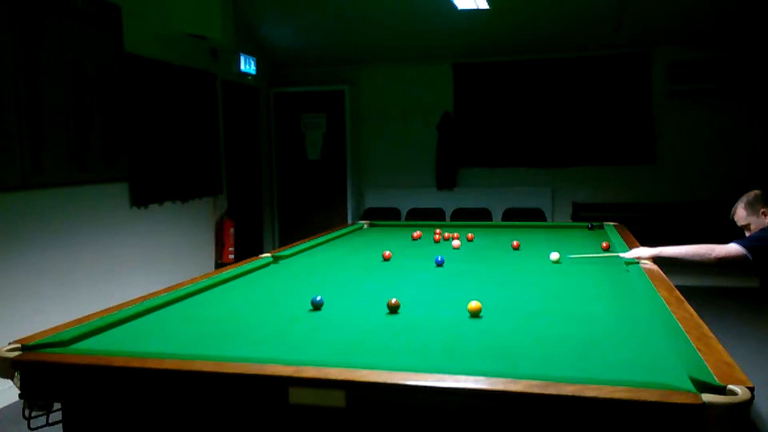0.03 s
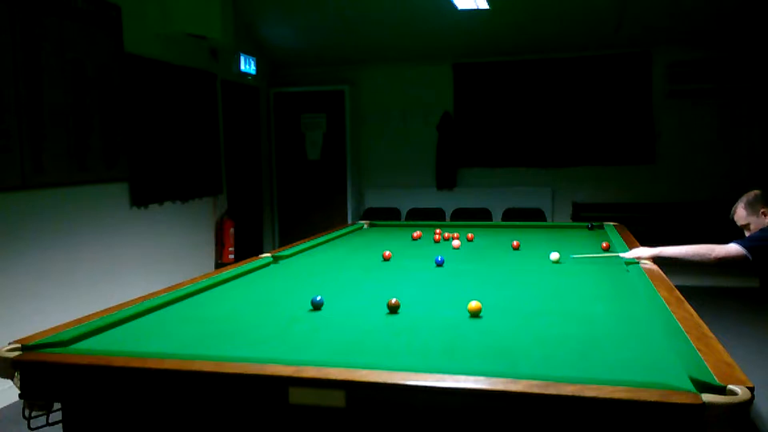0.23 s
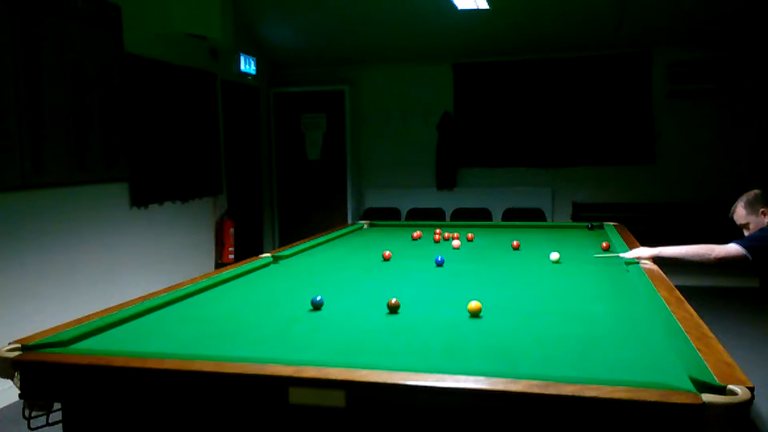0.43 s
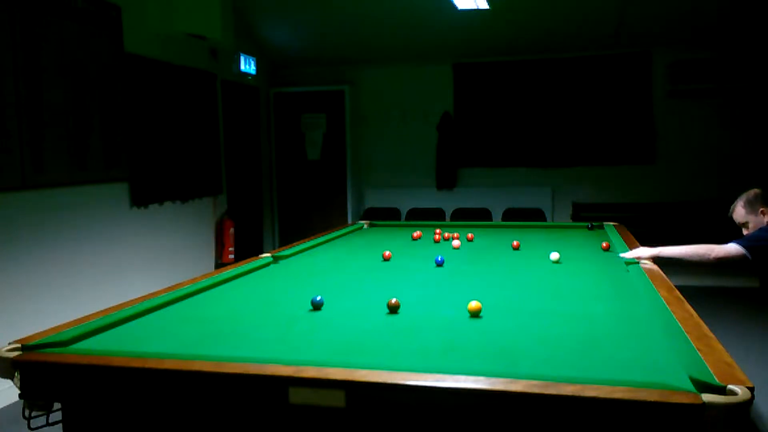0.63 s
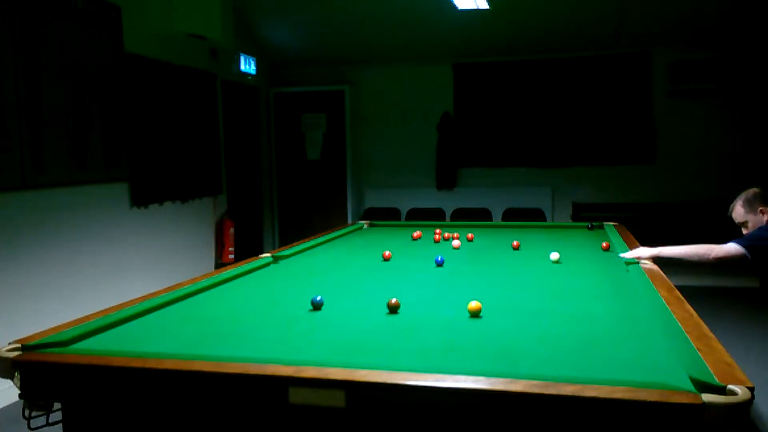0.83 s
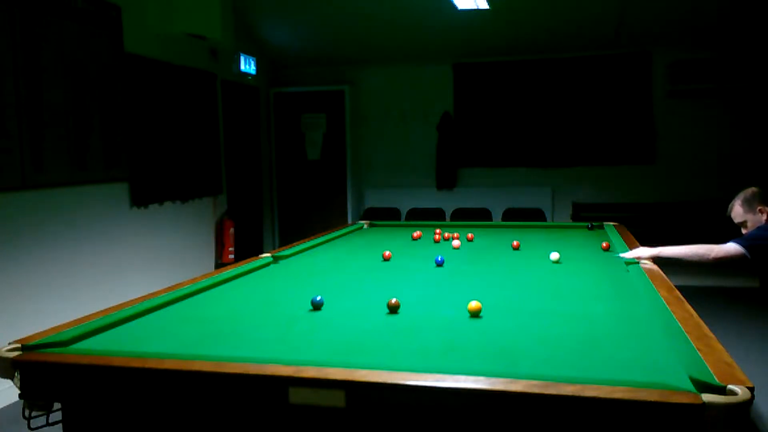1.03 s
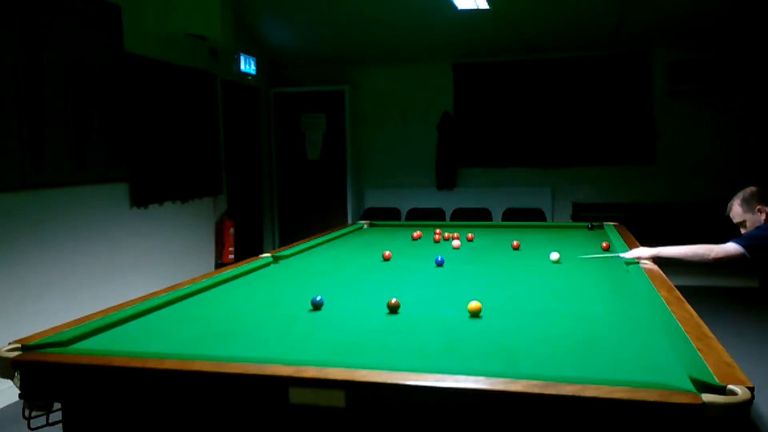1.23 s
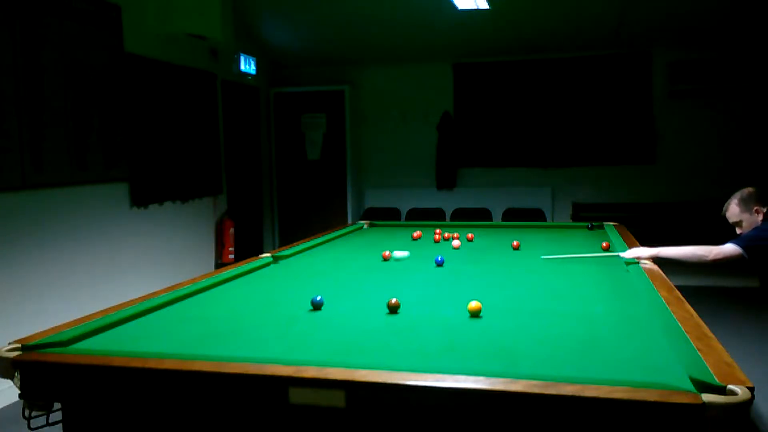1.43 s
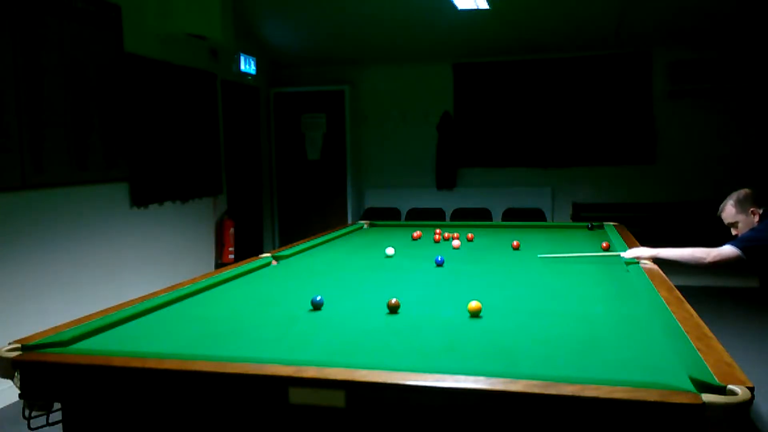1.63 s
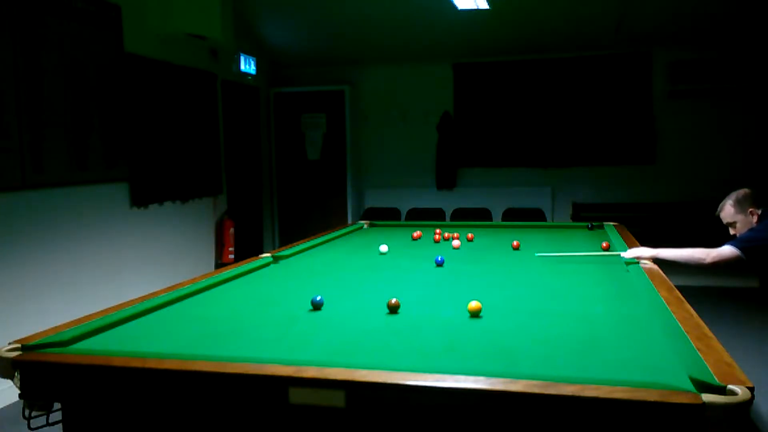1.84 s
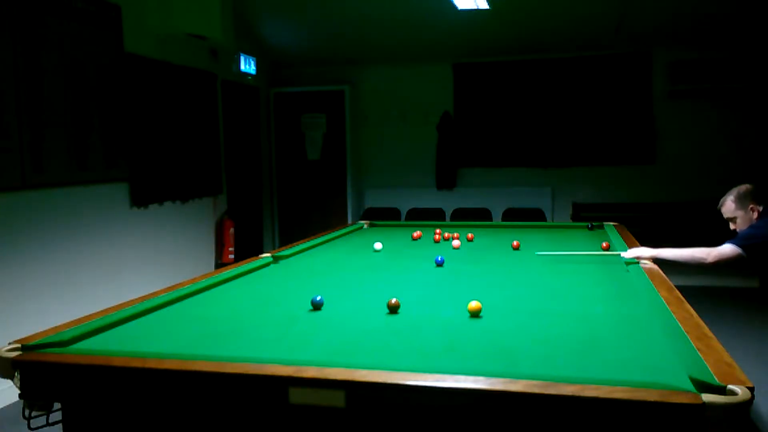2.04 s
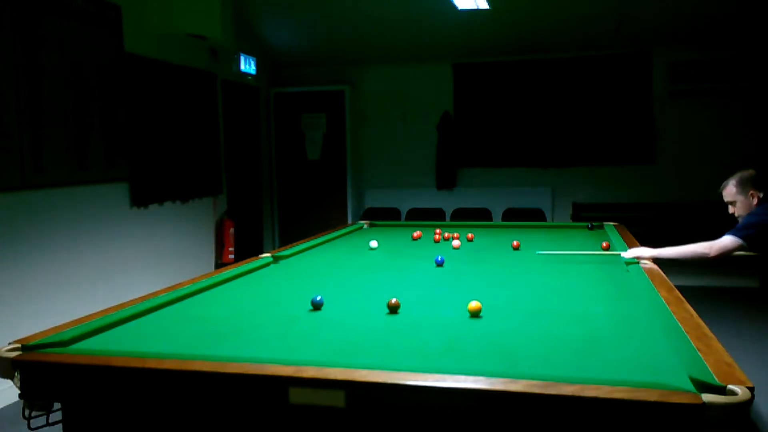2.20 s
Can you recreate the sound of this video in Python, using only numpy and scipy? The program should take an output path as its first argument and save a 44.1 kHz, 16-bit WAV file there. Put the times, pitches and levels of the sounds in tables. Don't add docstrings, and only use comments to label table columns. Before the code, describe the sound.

Billiard balls click hard just after a cue tip knocks the white; a ball then slaps into a leather pocket with a dull boom and rustles in the net, short room echo, hissy overloaded camera microphone.

```python
import sys
import numpy as np
from scipy import signal
from scipy.fft import rfft, irfft
from scipy.io import wavfile
from scipy.ndimage import uniform_filter1d

SR = 44100
rng = np.random.default_rng(int(sys.argv[2]) if len(sys.argv) > 2 else 0)


def attenuation_scalar(level_db):
    decades = np.asarray(level_db, float) / 20
    return 10 ** decades


def waveform_to_disk(signal):
    frames = np.transpose(np.atleast_2d(signal))
    scaled = np.clip(frames, -1, 1) * 32767
    samples = np.round(scaled).astype(np.int16)
    wavfile.write(sys.argv[1], SR, samples)


N = 99886


def evened(x):
    return x / np.sqrt(np.mean(x ** 2) + 1e-20)


def read(points, hz):
    f, value = np.transpose(points)
    return np.interp(np.log(hz + 1), np.log(f + 1), value)


def add(mix, s, sound):
    part = mix[round(s * SR):][:len(sound)]
    part += sound[:len(part)]


def noise(shape, size):
    hz = np.fft.rfftfreq(size, 1 / SR)
    spectrum = rfft(rng.standard_normal(size)) * attenuation_scalar(read(shape, hz))
    return evened(irfft(spectrum, size))


def ring(hz, db, t60, rise_s, size):
    t = np.arange(size) / SR
    return attenuation_scalar(db - 60 * t / t60) * np.sin(2 * np.pi * hz * t) * (1 - np.exp(-t / rise_s))


def low_pass(x, hz):
    taps = signal.firwin(255, hz, window=("kaiser", 8), fs=SR)
    return signal.oaconvolve(x, taps, "same")


def high_pass(x, hz):
    return signal.sosfilt(signal.butter(4, hz, "high", fs=SR, output="sos"), x)


def room(x, wet_db):
    # (f/Hz, t60/s)
    room_t60 = [(150, 0.32), (400, .58), (1040, 0.34), (2760, 0.33), (7280, 0.28), (15000, 0.34)]
    start_s, build_s = 0.012, 0.0034
    taps = np.zeros(SR)
    at = np.arange(0, SR - 16, 16)
    taps[at + rng.integers(0, 16, len(at))] = rng.choice([-1., 1.], len(at))
    hz, t, z = signal.stft(taps, SR, nperseg=256)
    dying = attenuation_scalar(-60 * t / read(room_t60, hz)[:, None])
    tail = signal.istft(z * dying, SR, nperseg=256)[1]
    tail = tail * np.clip((np.arange(len(tail)) / SR - start_s) / build_s, 0, 1)
    return attenuation_scalar(wet_db) * signal.fftconvolve(x, tail / np.linalg.norm(tail))[:N]


def hiss():
    # (f/Hz, level/dB)
    hiss_shape = [(24, -65), (40, -25), (457, -2), (557, -4), (1120, -2), (7390, -12), (9480, -13),
                  (15200, -16.5)]
    hump_hz, hump_width_hz, whine_hz = 9670, 500, 12010
    t = np.arange(N) / SR
    b, a = signal.iirpeak(hump_hz, hump_hz / hump_width_hz, SR)
    hump = evened(signal.lfilter(b, a, rng.standard_normal(N)))
    whine = np.sin(2 * np.pi * whine_hz * t)
    return attenuation_scalar(-61) * noise(hiss_shape, size=N) + attenuation_scalar(-74.5) * hump + attenuation_scalar(-77) * whine


def excess(x):
    threshold_db, recover_db_s = -34.5, 32
    power_db = 10 * np.log10(abs(uniform_filter1d(x ** 2, size=300)) + 1e-12)
    fall = np.arange(N) * recover_db_s / SR
    held_db = np.maximum.accumulate(power_db + fall) - fall
    return uniform_filter1d(np.maximum(held_db - threshold_db, 0), size=100)


def ticks():
    # (t/s, level/dB, f/Hz, t60/s)
    tick_table = [
        (1.3995, -32, 5000, .003),
        (1.4402, -30, 8000, .006),
        (2.121, -50, 2300, .008),
        (2.223, -56, 1900, .008),
    ]
    out = np.zeros(N)
    for s, db, hz, t60 in tick_table:
        add(out, s, ring(hz, db, t60, rise_s=.0003, size=2048))
    return out


def net():
    # (t/s, level/dB, rise/s, t60/s)
    rustles = [
        (2.1207, -45, 0.011, 0.23),
        (2.222, -56.5, 0.011, 0.22),
    ]
    # (f/Hz, level/dB)
    net_shape = [(59, -50), (100, -30), (648, 1), (1010, -10.5), (1310, -3), (5770, -6.5), (14400, -16.5),
                 (16000, -49)]
    grain_db, dull_hz, sheen_t60 = 1, 3500, .15
    out, t = np.zeros(N), np.arange(SR // 4) / SR
    for s, db, rise, t60 in rustles:
        wobble = evened(uniform_filter1d(rng.standard_normal(len(t)), size=40))
        rustle = evened(attenuation_scalar(grain_db * wobble) * noise(net_shape, size=len(t)))
        late = np.maximum(t - rise, 0)
        body = low_pass(rustle, dull_hz)
        sheen = rustle - body
        mixed = body * attenuation_scalar(-60 * late / t60) + sheen * attenuation_scalar(-60 * late / sheen_t60)
        add(out, s, np.minimum(t / rise, 1) * attenuation_scalar(db) * mixed)
    return out


def thuds():
    thud_starts = [
        1.405,
        1.425,
        1.64,
        1.744,
        1.745,
    ]
    # (level/dB, f/Hz, width/Hz, t60/s)
    thud_table = [(-31, 480, 280, .3), (-44, 220, 280, 1.5), (-58.5, 190, 80, 2), (-24, 600, 360, 0.4),
                  (-26, 350, 110, 0.56)]
    out, t = np.zeros(N), np.arange(SR) / SR
    for s, (db, hz, width, t60) in zip(thud_starts, thud_table):
        b, a = signal.iirpeak(hz, hz / width, SR)
        hump = rng.standard_normal(len(t))
        hump = signal.lfilter(b, a, signal.lfilter(b, a, hump))
        add(out, s, evened(hump) * np.minimum(t / .01, 1) * attenuation_scalar(db - 60 * t / t60))
    return out


def pocket():
    # (t/s, level/dB, f/Hz, t60/s)
    knocks = [(1.7362, -24, 1900, .008), (1.7385, -5, 1700, .006), (1.7408, 2, 1550, .008),
              (1.7408, -20, 6500, .003), (1.7443, -4, 650, .014), (1.7460, -7, 1100, .008),
              (1.7475, -8, 1400, .006), (1.7486, -6, 2000, .004), (1.7500, -7, 1800, .005),
              (1.7516, -9, 3000, .006), (1.7550, -10, 1100, .01), (1.7553, -14, 3500, .005),
              (1.7600, -18, 2000, .006), (1.7690, -18, 900, .012)]
    # (f/Hz, level/dB)
    leather_shape = [(59, -43.5), (100, -36.5), (535, 0), (910, 5), (1280, -13), (1580, 2.5),
                     (11200, -34.5), (16000, -55.5)]
    leather_s, leather_db, rise_s, hold_s, leather_t60 = 1.738, -14, 0.0026, 0.013, 0.053
    out, t = np.zeros(N), np.arange(SR // 2) / SR
    for s, db, hz, t60 in knocks:
        add(out, s, ring(hz, db + 2.5, t60 * 0.93, rise_s=.00012, size=2048))
    fading = attenuation_scalar(leather_db - 60 * np.maximum(t - hold_s, 0) / leather_t60)
    slap = np.minimum(t / rise_s, 1) * fading * noise(leather_shape, size=len(t))
    add(out, leather_s, slap)
    return out + room(high_pass(out, 273), wet_db=-12)


def cue():
    # (f/Hz, level/dB, t60/s)
    shaft_modes = [(1677, -1, .07), (1910, -6, .06), (2310, -10.5, 0.15), (2345, -5.5, .06),
                   (3120, -5, 0.053), (3229, -3, 0.077), (3273, -2.5, 0.089), (3520, -9, .06),
                   (3975, -9.5, 0.048), (4720, -13.5, 0.033), (5313, -19.5, 0.069), (5798, -13.5, 0.027),
                   (8050, -21.5, 0.064)]
    # (f/Hz, level/dB)
    scrape_shape = [(100, -48), (250, -13.5), (600, -5.5), (1400, -10), (3000, -15), (8800, -24),
                    (12000, -37.5), (16000, -59)]
    blow_s, blow_db, rise_s = 1.3998, -17, .0015
    scrape_db, scrape_t60 = -20.5, 0.12
    out, t = np.zeros(N), np.arange(SR // 2) / SR
    shaft = sum(ring(hz, db + blow_db, t60, rise_s, size=len(t)) for hz, db, t60 in shaft_modes)
    scrape = noise(scrape_shape, size=len(t)) * attenuation_scalar(scrape_db - 60 * t / scrape_t60)
    add(out, blow_s, shaft + scrape * np.minimum(t / rise_s, 1))
    return out + room(out, wet_db=-5)


def click(treble_db):
    contact_s, dull_hz, tilt = .000297, 6200, 3.0
    ball_hz, ball_damp, ball_low_hz = 2560, 0.36, 940
    t = np.arange(512) / SR
    s = 1j * np.fft.rfftfreq(512, 1 / SR)
    force = np.sin(np.pi * np.clip(t / contact_s, 0, 1)) ** 1.5
    sphere = s * ball_hz / (s ** 2 + 2 * ball_damp * ball_hz * s + ball_hz ** 2)
    above = 1 / (1 + (dull_hz / (abs(s) + 1)) ** 12)
    treble = attenuation_scalar(treble_db - 0.5) * (abs(s) / dull_hz) ** tilt
    thin_bass = (s / (s + ball_low_hz)) ** 2
    lift = (1 - above + above * treble) * thin_bass
    wave = irfft(rfft(np.roll(force, 64)) * sphere * lift, len(t))
    return -wave / abs(wave).max()


def balls():
    # (t/s, level/dB, treble/dB)
    clicks = [(1.5756, -9, 8), (1.57595, 6, 9), (1.5766, 4, 2), (1.5775, -6, -5), (1.5782, -7, -5),
              (1.5794, -2, 15), (1.5802, -13, 8), (1.5810, -13, 5), (1.5821, -14, 8), (1.5826, -15, 3),
              (1.5835, -2, -12), (1.5849, -11, 3), (1.5858, -14, 3), (1.5865, -8, 3), (1.5880, -13, 3),
              (1.5920, -13, 3), (1.6093, -9, -10), (1.6135, -17, -10), (1.6219, -13, -8),
              (1.6230, -16, -10), (1.6270, -15, -10)]
    out, first = np.zeros(N), np.zeros(N)
    lead = 64 / SR
    for s, db, treble_db in clicks:
        add(out, s - lead, attenuation_scalar(db + 2) * click(treble_db))
    first_s = clicks[0][0]
    add(first, first_s - lead, click(-0.5))
    add(first, first_s, attenuation_scalar(-30) * np.array([1., -2., 1.]))
    return out + room(first, wet_db=0)


def scene():
    shot = high_pass(cue() + balls() + pocket() + thuds(), 138.2)
    ducked_hiss = hiss() * attenuation_scalar(-.5 * excess(shot))
    return (shot + net() + ticks() + ducked_hiss)[None]


def thin_out(x):
    # (t/s, length/s, above f/Hz, keeps over level/dB)
    thin_moments = [
        (1.504, .02, 3500, -74),
        (2.03, .024, 3500, -92),
        (2.08, .024, 1200, -91),
        (2.177, .02, 3800, -83),
    ]
    hz, t, z = signal.stft(x, SR, nperseg=512, noverlap=384)
    for s, length, low_hz, db in thin_moments:
        now = (t > s) & (t < s + length)
        level = uniform_filter1d((abs(z[:, now]) ** 2).mean(1), size=3)
        weak = (hz > low_hz) & (level < attenuation_scalar(2 * db))
        z[np.ix_(weak, now)] *= .3
    return signal.istft(z, SR, nperseg=512, noverlap=384)[1][:N]


def band_limit(x):
    return signal.sosfilt(signal.butter(12, 16610, fs=SR, output="sos"), x)


def record(dry):
    open_s, fade_in_s, clip = 0.073, 0.024, .9
    fade = np.sin(np.pi / 2 * np.clip((np.arange(N) / SR - open_s) / fade_in_s, 0, 1))
    mic = low_pass(dry[0], 15300)
    edged = low_pass(np.clip(mic * fade, -clip, clip), 16300)
    return band_limit(thin_out(edged)[None])


dry = scene()
out = record(dry)
waveform_to_disk(out)
```